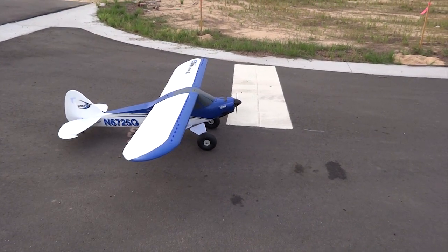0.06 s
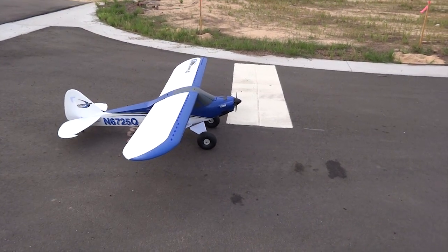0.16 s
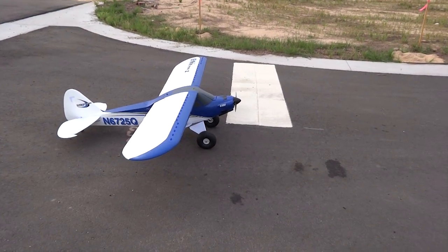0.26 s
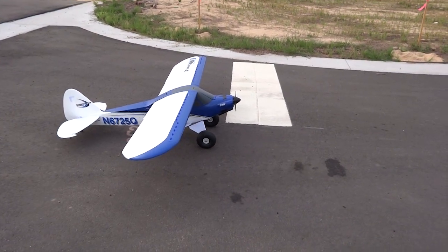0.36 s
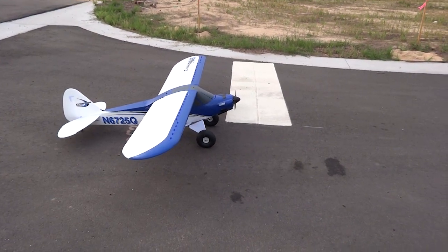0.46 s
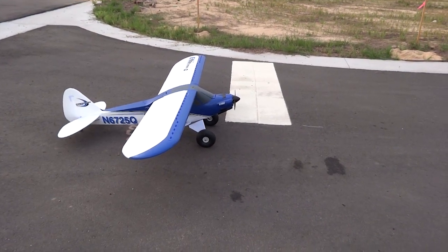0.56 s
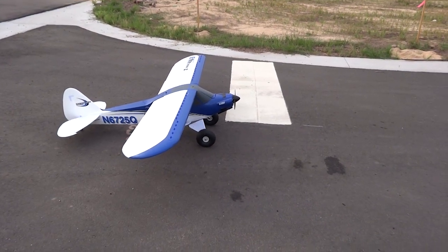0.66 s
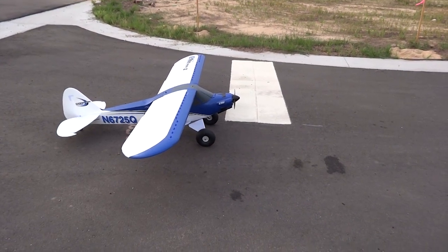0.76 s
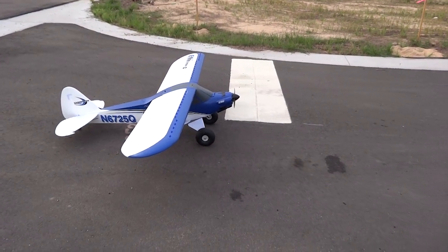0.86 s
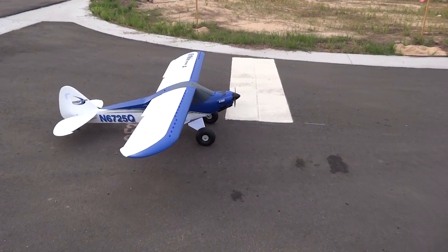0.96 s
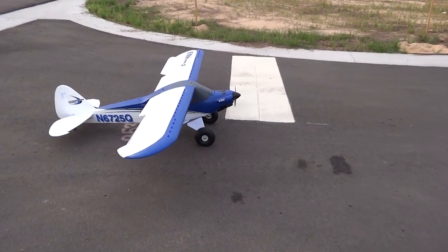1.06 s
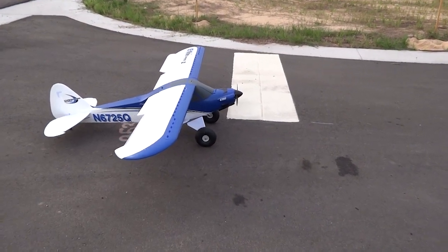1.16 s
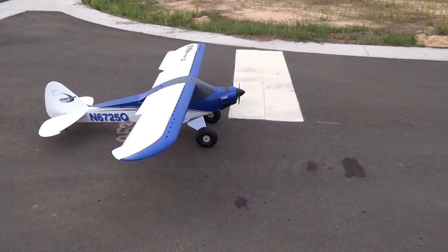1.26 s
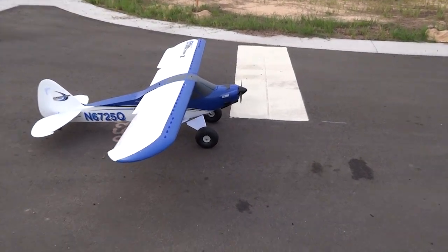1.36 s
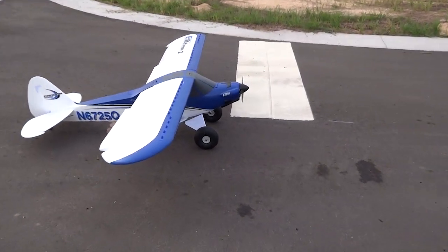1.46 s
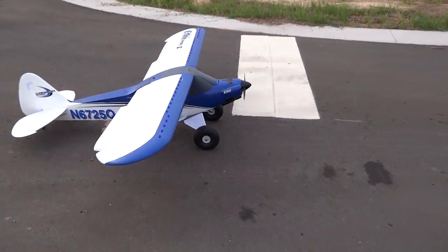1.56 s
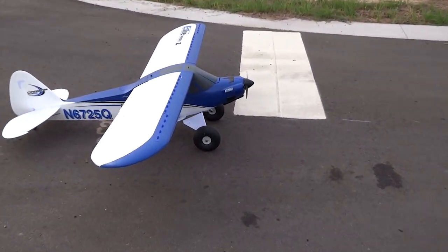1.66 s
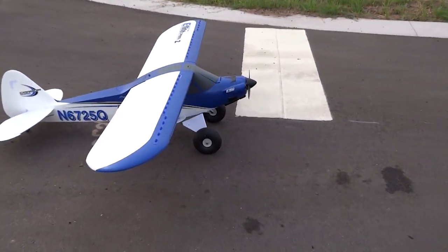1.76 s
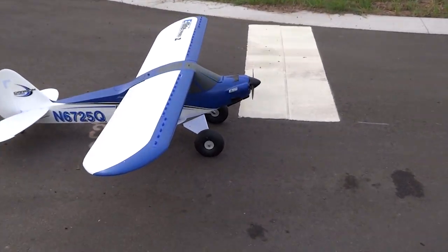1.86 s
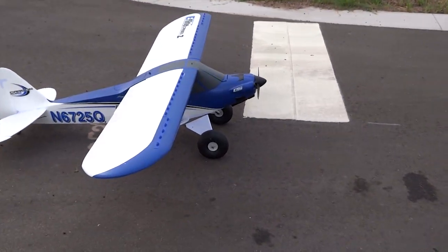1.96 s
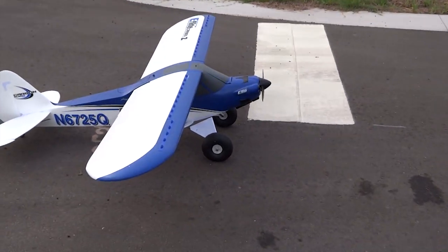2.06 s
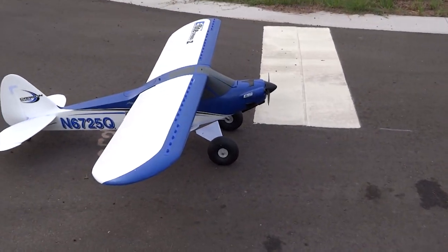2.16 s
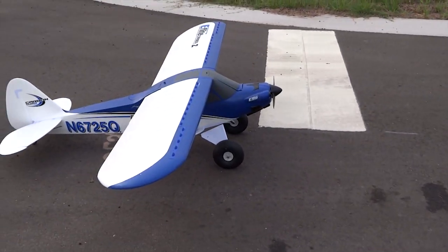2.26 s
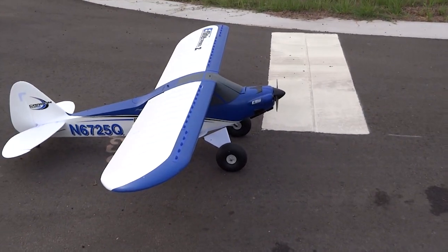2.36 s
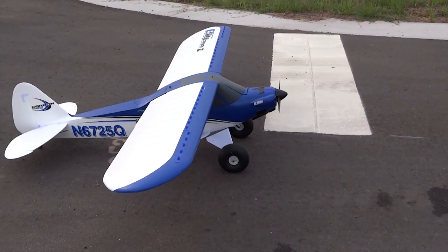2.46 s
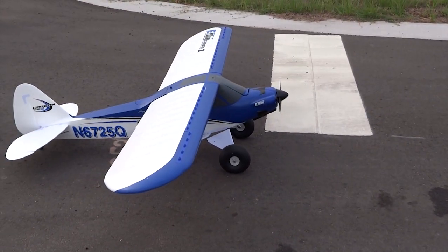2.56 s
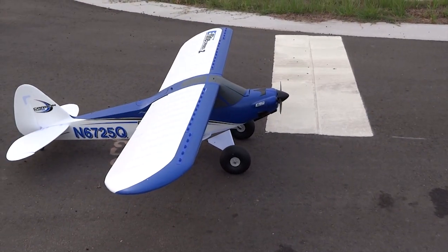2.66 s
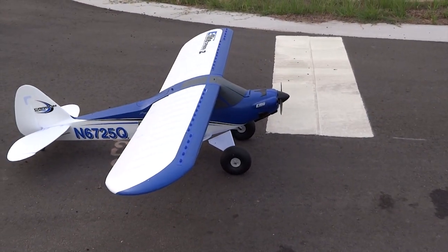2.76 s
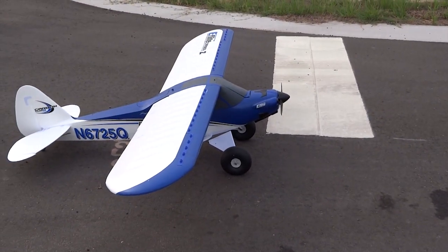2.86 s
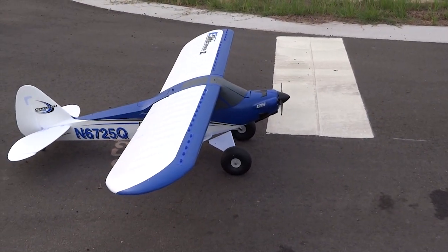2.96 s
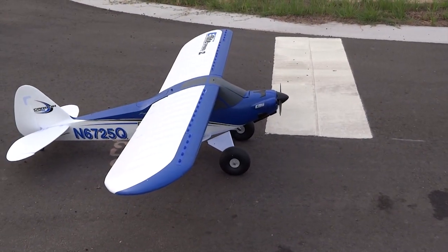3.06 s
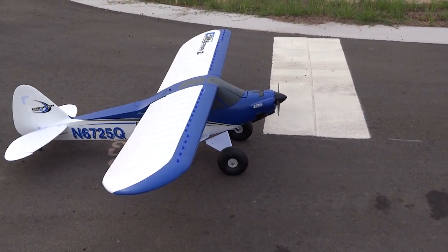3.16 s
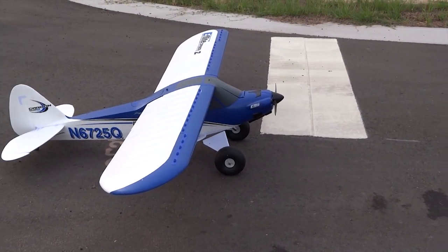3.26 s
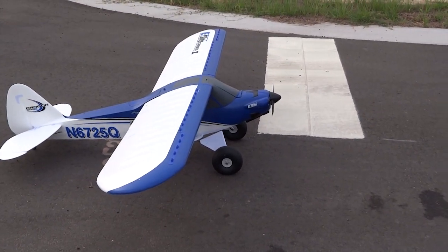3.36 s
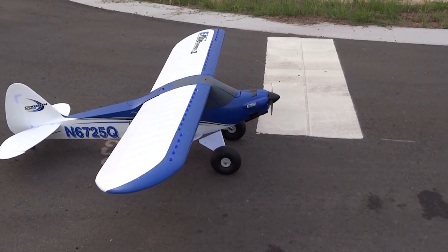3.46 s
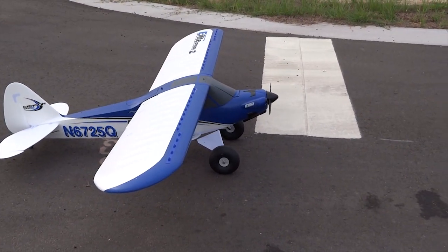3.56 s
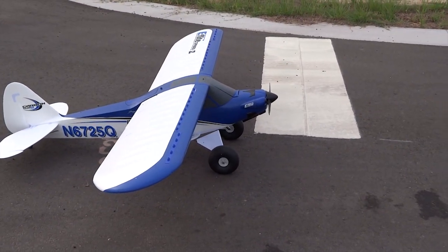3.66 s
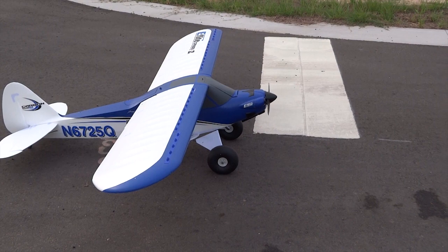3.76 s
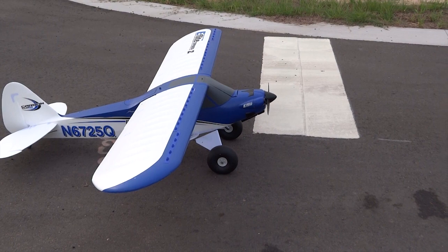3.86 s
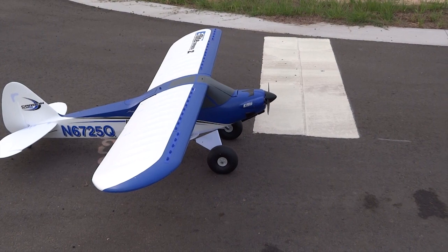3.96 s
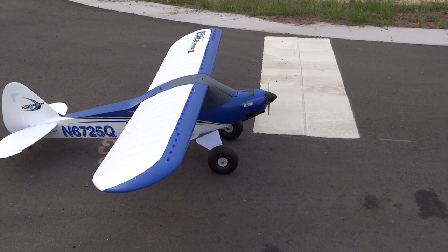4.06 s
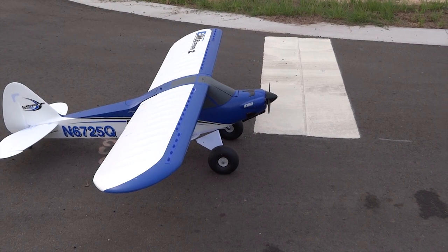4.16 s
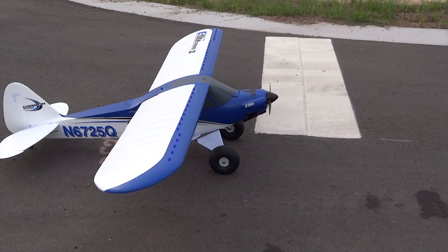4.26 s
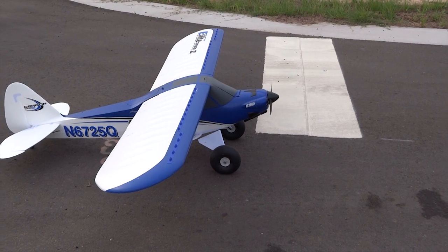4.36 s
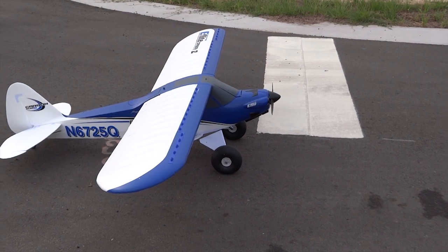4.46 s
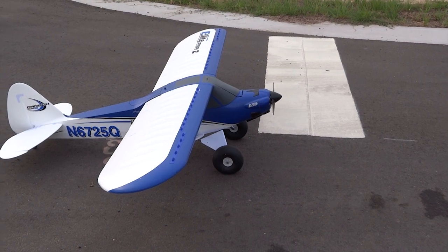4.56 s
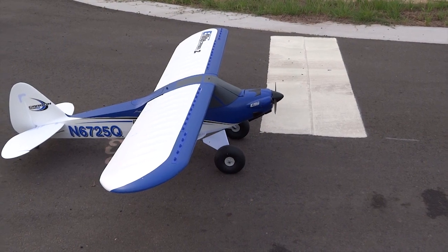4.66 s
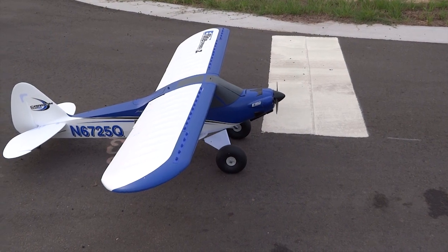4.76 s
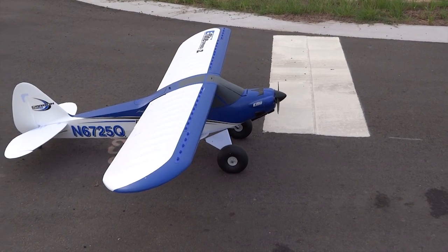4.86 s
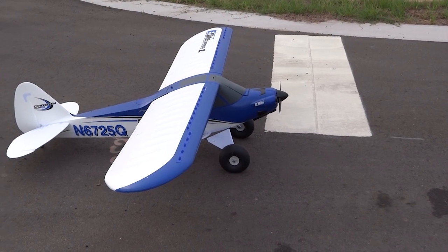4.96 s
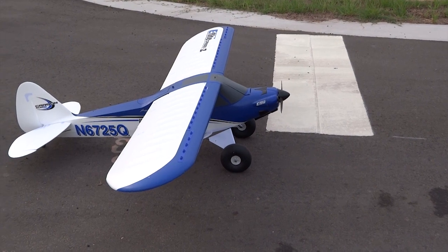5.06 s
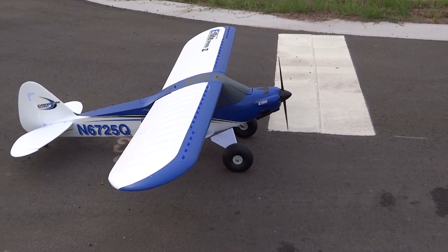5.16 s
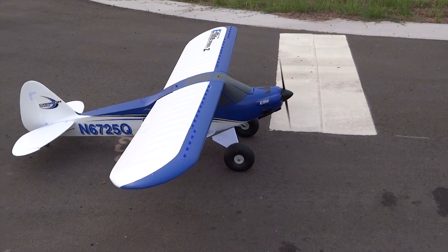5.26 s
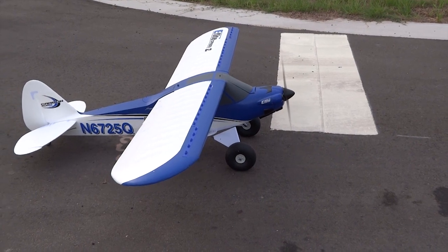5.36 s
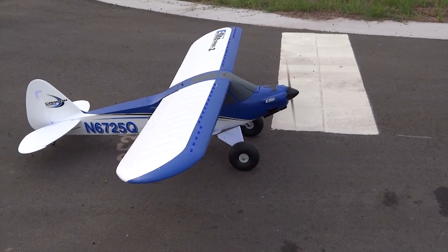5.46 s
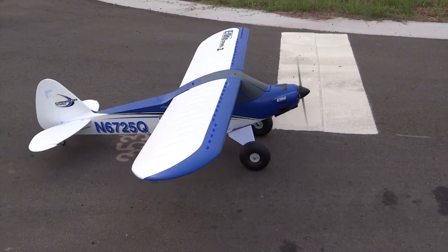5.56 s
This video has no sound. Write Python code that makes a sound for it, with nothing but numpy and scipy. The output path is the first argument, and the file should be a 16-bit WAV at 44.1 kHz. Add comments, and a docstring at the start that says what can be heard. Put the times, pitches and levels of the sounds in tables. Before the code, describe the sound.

Outdoors, nearly mono, on a camera microphone. From 0 to about 0.8 s a foam model plane's tail servo makes gritty plastic whirrs in short uneven bursts, with a dull knock at 0.1 s and small ticks. From 0.85 to 1.8 s the wing servos take over, brighter and louder, rasping strongest around 1.5 to 1.7 s. A thin, steady pulsed electronic buzz, with tiny irregular ticks, lies beneath throughout. Around 1.7 to 2.2 s a faint, very high camera zoom whir runs, with plastic clicks at 2.06 and 2.4 to 2.55 s; it returns faintly near 4.4 s. Distant gliding bird whistles with dull echo come about every half second from 2.2 to 4.9 s, over soft rumble and hiss. A brief servo twitch and ticks occur at 4.75 s. At 5.2 s the motor jolts on, singing thinly and rattling, then its whine climbs steeply, with propeller churn, into an abrupt loud end.

```python
"""The servos of a foam model plane waggle its tail and wing flaps: gear teeth drive case resonances,
over a steady pulsed holding buzz. At the end the brushless motor kicks in; harmonics locked to its shaft
make a loud rising whine, and the propeller adds blade tones and churned air.
A camera's zoom clicks as decaying modes and whirs as wavering tones over noise. Far off, a bird
whistles gliding tones with a dull echo, over a faint outdoor rumble and hiss of filtered noise."""
import sys
import numpy as np
from scipy import signal
from scipy.fft import rfft, irfft, next_fast_len
from scipy.io import wavfile
from scipy.ndimage import uniform_filter1d

SR = 44100
rng = np.random.default_rng(int(sys.argv[2]) if len(sys.argv) > 2 else 0)


def int16_out(signal):
    """Quantize to a 16-bit WAV file."""
    q = np.round(np.clip(np.atleast_2d(signal).T, -1, 1) * 32767)
    wavfile.write(sys.argv[1], SR, q.astype(np.int16))


N = 248228
TIME = np.arange(N) / SR


def from_db(db):
    """Logarithmic level: decibels to amplitude gain."""
    return 10 ** (np.asarray(db) / 20)


def rms_one(x):
    """Normalisation: scale to rms 1."""
    return x / np.sqrt(np.mean(x ** 2) + 1e-20)


def in_time(rows):
    """Linear interpolation: each column of a timed curve at every sample."""
    seconds, *columns = np.transpose(rows)
    return [np.interp(TIME, seconds, column) for column in columns]


def drift(rate):
    """Band-limited chance: random knots, rate per second, joined by lines, with spread 1."""
    knots = rng.standard_normal(N // 8)
    return np.interp(TIME * rate, np.arange(len(knots)), knots) / np.sqrt(2 / 3)


def cycles(hz):
    """Phase is the integral of frequency: running phase in radians."""
    return 2 * np.pi * np.cumsum(hz) / SR


def cut(x, hz, kind, order=2):
    """Butterworth filtering: a maximally flat pass band."""
    sections = signal.butter(order, np.clip(hz, 10, .45 * SR), kind, fs=SR, output="sos")
    return signal.sosfilt(sections, x)


def coloured(x, spectrum):
    """Spectral shaping by a smooth (Hz, dB) curve that falls away below its first point."""
    size = next_fast_len(N + 4096)
    hz = np.arange(1, size // 2 + 2) * SR / size
    points, db = np.transpose(spectrum)
    gain = from_db(np.interp(np.log(hz), np.log(points), db))
    gain = gain * np.minimum(hz / points[0], 1) ** 2
    return irfft(rfft(x, size) * gain, size)[:N]


def resonate(x, modes, direct):
    """Modal superposition: parallel two-pole resonances on top of a share of the direct drive."""
    out = direct * x
    for hz, width, db in modes:
        radius = np.exp(-np.pi * width / SR)
        feed = np.array([1, 0, -1]) * (1 - radius ** 2) / 2
        feedback = [1, -2 * radius * np.cos(2 * np.pi * hz / SR), radius ** 2]
        out = out + from_db(db) * signal.lfilter(feed, feedback, x + 1e-18)
    return out


def grains(per_s, spread_db):
    """Shot noise: tiny random impacts of uneven size."""
    size_db = spread_db * np.minimum(rng.exponential(1, N), 4)
    sizes = from_db(size_db) * rng.choice([-1, 1], N)
    return rms_one(sizes * (rng.random(N) < per_s / SR))


def evened(x, size):
    """Envelope normalisation: hold the rms over a running window of size samples at 1."""
    return x / np.sqrt(np.abs(uniform_filter1d(x * x, size=size)) + 1e-12)


def swell(start, rise, hold, fall):
    """Inertia: the speed of a small motor, 0 to 1, gathers pace, holds and slows to a stop."""
    ramp = np.minimum((TIME - start) / rise, (start + rise + hold + fall - TIME) / fall)
    return np.sin(np.pi / 2 * np.clip(ramp, 0, 1))


def blend(values, weights):
    """Dominance by power: where events overlap, the louder one sets the value."""
    power = weights ** 2
    return np.sum(values * power, axis=0) / (np.sum(power, axis=0) + 1e-20)


# servo moves: (start [s], speeding up [s], full speed [s], slowing [s], top mesh rate [Hz],
# relative gear level [dB], tooth hiss relative to gears [dB], relative whirr drive [dB])
TAIL_MOVES = [ (0.0, .004, .11, 0.073, 310, -36.5, -8, -21), (0.16, .03, 0.22, 0.097, 250, -57, -3, -12),
              (0.39, .12, .03, 0.087, 365, -37, -5, -13.5), (0.59, .035, .005, 0.036, 270, -42, -7, -14),
              (0.645, .06, .04, 0.0586, 350, -37.5, -5.5, -17),
              (0.71, .085, 0.0084, 0.058, 440, -34.5, -4, -14.5), (3.38, .1, 0.2, .2, 250, -61, -18, -25), ]
WING_MOVES = [ (0.855, 0.042, .05, 0.081, 260.3, -40, -8.5, -39),
              (0.94, .13, 0.063, 0.047, 439.9, -37, 0.5, -15),
              (1.16, 0.024, 0.21, 0.092, 247.8, -60, -2.5, -20),
              (1.395, 0.14, .03, .06, 437.8, -31, 0.5, -8),
              (1.605, 0.025, .015, 0.043, 282.3, -40, -0.5, -14),
              (1.64, 0.054, 0.00465, .06, 382.7, -29.5, -0.5, -11.5),
              (1.72, 0.023, 0.048, 0.057, 265, -42.5, -14.5, -41),
              (4.74, .07, 0.072, 0.031, 270, -50.5, -5, -20), ]
# colour of the servo gears: (frequency [Hz], relative spectral level [dB])
TAIL_COLOUR = [(120, -62), (200, -26.5), (352, -20.5), (437, -17.5), (842, -17), (1030, -8), (1400, -7.5),
               (2060, 0), (2250, -9), (3180, -1), (4580, -15), (5700, -15), (9140, -11), (13900, -19.5),
               (15500, -32.5)]
WING_COLOUR = [(120, -56), (200, -15), (358, -21.5), (437, -11.5), (506, -5), (769, -8), (858, -10),
               (974, -4.5), (1510, -6), (2290, -5), (3240, -6.5), (5110, -11), (7620, -6), (9140, 2),
               (15500, -9.5)]
# resonances of servo cases and linkage: (frequency [Hz], width [Hz], gain [dB])
TAIL_MODES = [(1230, 67, -1), (2080, 49, 1.5), (2437, 42, 8.5), (3060, 90, -14), (5820, 150, 6),
              (8700, 190, -10)]
WING_MODES = [(900, 23, -13), (1526, 40, 8), (2770, 180, -14), (3220, 600, 1.5), (3840, 190, -22),
              (9050, 320, -4)]
# tones of uneven teeth: (multiple of the mesh rate, relative level [dB])
MESH_ORDERS = [(1, -2), (2, 0), (3, -5), (4, -6), (5, -12), (6, -11)]
# mesh rate, loudness, hiss and whirr all follow the servo's speed
CRAWL_SHARE, LOUDNESS_POWER, HISS_POWER, WHIRR_GROWTH_DB = .56, 1.487, 1.71, 10
# radio frames give the servos a fresh push, and moving servos throb at their rate
FRAME_HZ, FRAME_THROB = 45.4, .13


def servo(moves, colour, modes, direct, tone_db, rattle_db, gear_db, hiss_db):
    """Mesh excitation: plastic gear teeth click and scrape in step with the mesh and ring the case."""
    speed = np.array([swell(*move[:4]) for move in moves])
    top_hz, level_db, bright_db, top_whirr_db = np.transpose(moves)[4:, :, None]
    gear_gain = from_db(level_db + gear_db) * speed ** LOUDNESS_POWER
    hiss_gain = from_db(level_db + bright_db + hiss_db) * speed ** HISS_POWER

    mesh_hz = blend(top_hz * (CRAWL_SHARE + (1 - CRAWL_SHARE) * speed), gear_gain)
    mesh = cycles(mesh_hz * (1 + .035 * drift(300)))
    teeth = grains(11000, 3.4) * (1 + 0.045 * np.cos(mesh)) * from_db(rattle_db * drift(170))
    whirr_db = blend(top_whirr_db + WHIRR_GROWTH_DB * (speed - 1), gear_gain)
    whirr = sum(np.sin(k * mesh) * from_db(db + 3 * drift(35)) for k, db in MESH_ORDERS)

    drive = teeth + from_db(whirr_db + tone_db) * whirr
    sound = coloured(resonate(drive, modes, direct), colour)
    gears = evened(cut(sound, 5720, "low", order=4), size=1500)
    hiss = rms_one(cut(sound, 4920, "high", order=4))
    throb = 1 + FRAME_THROB * np.cos(2 * np.pi * FRAME_HZ * TIME)
    # overlapping moves add in power
    return throb * (np.linalg.norm(gear_gain, axis=0) * gears + np.linalg.norm(hiss_gain, axis=0) * hiss)


# the load on the holding servos changes and stays:
# (from time [s], relative level of 3rd harmonic [dB], of 4th [dB], of 5th [dB])
HOLDS = [ (0.0, -59, -56.5, -65.5), (0.43, -62, -59, -70), (1.17, -54.5, -57.5, -68),
         (1.33, -67, -59.5, -80), (1.79, -63, -57.5, -78), (2.06, -63, -55, -64), (2.65, -57, -53, -60),
         (4.76, -63.5, -59, -66.5), ]
# weaker buzz harmonics: (multiple of the buzz rate, relative level [dB])
BUZZ_ORDERS = [(1, -19), (2, -20), (6, -20), (7, -13), (8, -18), (9, -23), (10, -18), (11, -16), (12, -23),
               (13, -26), (14, -31)]
BUZZ_HZ, HOLD_FADE_S = 834.7, 0.028
WANDER_DB, WANDER_PER_S = 1.2, 14  # of the three main harmonics
NUDGE_SHARE, NUDGE_TICK_DB = .4, -41  # share of radio frames that nudge a servo; gain of its tick


def holding_buzz(flutter_db=1.8, upper_wander_db=2., upper_db=-2.0):
    """Periodic excitation: steady drive pulses make harmonics; a radio-frame nudge dips them and ticks."""
    starts, *columns = np.transpose(HOLDS)
    spell = np.searchsorted(starts[1:], TIME)
    fade = 1 + round(HOLD_FADE_S * SR)
    main_db = [uniform_filter1d(column[spell], size=fade) for column in columns]
    fourth_db = main_db[1]
    phase = cycles(BUZZ_HZ + .4 * drift(9))

    new_frame = np.diff(np.floor(TIME * FRAME_HZ), prepend=0)
    nudges = new_frame * (rng.random(N) < NUDGE_SHARE) * rng.uniform(.15, .7, N)
    steady = 1 - np.minimum(np.convolve(nudges, np.hanning(160), "same"), 1)

    buzz = 0
    for k, db in enumerate(main_db, 3):
        buzz = buzz + from_db(db + WANDER_DB * drift(WANDER_PER_S)) * np.sin(k * phase)
    for k, db in BUZZ_ORDERS:
        gain = from_db(fourth_db + db + upper_db + upper_wander_db * drift(9))
        buzz = buzz + gain * np.sin(k * phase + rng.uniform(0, 2 * np.pi))

    tick_modes = [(2750, 350, 22), (3300, 300, 26), (4150, 400, 17)]  # Hz, width Hz, dB
    ticks = cut(resonate(nudges, tick_modes, direct=0), [2500, 4900], "band")
    return np.sqrt(2) * from_db(flutter_db * drift(16)) * steady * buzz + from_db(NUDGE_TICK_DB) * ticks


# linkage ticks: (time [s], relative level [dB])
TICKS = [(0.238, -37), (0.281, -33.5), (0.348, -37), (0.3736, -31.5), (0.6844, -45), (0.856, -27.5),
         (0.8966, -25.5), (1.627, -25), (1.8134, -52), (4.752, -34), (4.775, -31.5), (4.818, -28),
         (5.2135, -46)]


def linkage_ticks(t60=0.054, level_db=-9, attack_s=.003):
    """Impact and decay: slack in the gears and push rods is taken up with a short rattle."""
    envelope = np.zeros(N)
    for s, db in TICKS:
        age = TIME - s
        attack = np.clip(age / attack_s + .5, 0, 1)
        envelope += from_db(db - 60 * np.abs(age) / t60) * attack
    rattle = resonate(cut(rng.standard_normal(N), 3000, "high"), WING_MODES, direct=0.15)
    return from_db(level_db) * envelope * rms_one(rattle)


# knock of a control surface at its stop: (time [s], peak level [dB])
KNOCK = [(0.097, -29)]
# ring of the foam tail: (frequency [Hz], width [Hz], gain [dB])
KNOCK_MODES = [(960, 64, -7), (1010, 100, 5), (1150, 91, 2)]


def surface_knock():
    """Impulse response: a control surface bumps its stop; the foam tail answers with a dull ring."""
    push = np.zeros(N)
    for s, db in KNOCK:
        push[round(s * SR)] = from_db(db)
    ring = resonate(push, KNOCK_MODES, direct=0)
    return ring * push.max() / np.abs(ring).max()


# motor shaft run-up: (time [s], speed [turns per s])
SHAFT = [(5.21, 1), (5.32, 7.4), (5.35, 11.4), (5.42, 24.1), (5.50, 39.6), (5.56, 55), (5.63, 69.5)]
# airframe resonances: (frequency [Hz], width [Hz], gain [dB])
AIRFRAME_MODES = [(220, 52, 5), (572, 29, 6.5), (680, 46, -2.5), (934, 39, 3), (996, 54, 6),
                  (1222, 67, 2.5), (1456, 48, -1.5), (1669, 72, 6), (2103, 65, 4.5), (2434, 115, 3.5),
                  (2550, 53, -6), (3080, 110, -10), (4110, 130, -7), (4680, 70, -0.5)]
# whine of 14 poles passing 12 slots:
# (multiple of 42 cycles per turn, relative level [dB], speed above which it fades [turns per s])
WHINE_ORDERS = [(1, -18, 51.2), (2, -20.5, 61), (3, -27.5, 26), (4, -32, 22)]
MOTOR_START_S = 5.2135
RADIATES_ABOVE_HZ = 990  # the small nose radiates lower tones poorly


def motor_whine(level_db=2.5, fade_power=8):
    """Swept resonance: commutation harmonics rise and flare as they cross each airframe mode."""
    turns, = in_time(SHAFT)
    angle = cycles(turns * (1 + .015 * drift(500)))
    commutation, commutation_hz = 42 * angle, 42 * turns
    # unequal magnets make the pull throb within each turn
    throb = 1 + .3 * np.cos(2 * angle) + .25 * np.cos(7 * angle)
    pull = 0
    for k, db, fade_turns in WHINE_ORDERS:
        radiated = 1 / np.hypot(1, (RADIATES_ABOVE_HZ / (k * commutation_hz)) ** 2)
        fading = 1 / np.hypot(1, (turns / fade_turns) ** fade_power)
        tone = from_db(db + 2 * drift(250)) * np.sin(k * commutation)
        pull = pull + radiated * fading * tone
    ringing = resonate((TIME > MOTOR_START_S) * throb * pull, AIRFRAME_MODES, direct=.35)
    return from_db(level_db) * cut(ringing, 240, "high")


# colour of the rattling airframe: (frequency [Hz], relative spectral level [dB])
AIRFRAME_COLOUR = [(120, -22), (220, -15), (400, -3.5), (600, -3.5), (900, 5), (1700, 3), (2600, 1.5),
                   (3500, -4.5), (5000, -15), (7000, -11), (12000, -21)]
# colour of bearing and blade-tip hiss: (frequency [Hz], relative spectral level [dB])
MOTOR_HISS = [(2500, 8), (3500, 23), (4700, 15.5), (6000, 12.5), (7500, 12), (10000, 11.5), (13000, 14.5),
              (15500, 2)]


def motor_rattle(rattle_db=-20, lock_db=-4, shaking_turns=4.48, shaking_power=3.7,
                 bearing_db=-28, bearing_power=0.81, tip_db=-23, tip_power=5):
    """Speed-dependent excitation: shaking rattles mount and cowl; bearings and tips hiss with speed."""
    turns, = in_time(SHAFT)
    angle, speed = cycles(turns), turns / 60
    shaking = 1 / (1 + (shaking_turns / turns) ** shaking_power)
    # the shaking eases while the rotor runs locked to the drive
    locked = np.interp(TIME, [5.27, 5.35, 5.46, 5.58], [0, 1, 1, 0])
    knocks = grains(12000, 1.6) * (1 + .3 * np.cos(42 * angle))
    ringing = resonate(knocks, AIRFRAME_MODES, direct=0.44)
    body = evened(coloured(ringing, AIRFRAME_COLOUR), size=500)
    rattle = from_db(rattle_db + lock_db * locked) * shaking * body

    hiss = rms_one(coloured(grains(20000, 3.9), MOTOR_HISS)) * (1 + 0.2 * np.cos(2 * angle))
    bearing_gain = from_db(bearing_db) * speed ** bearing_power
    tip_gain = from_db(tip_db) * np.minimum(speed, 1) ** tip_power
    return (TIME > MOTOR_START_S) * (rattle + np.hypot(bearing_gain, tip_gain) * hiss)


def motor_kick(level_db=-40, t60=0.032):
    """Transient excitation: the first current pulse jolts the rotor and the whole nose."""
    age = TIME - MOTOR_START_S
    jolt = rms_one(resonate(cut(rng.standard_normal(N), 500, "high"), AIRFRAME_MODES, direct=0.33))
    return jolt * (age >= 0) * from_db(level_db - 60 * np.abs(age) / t60)


# two-blade propeller: (cycles per turn, relative level [dB])
PROP_ORDERS = [(2, -50.5), (4, -31.5), (6, -32.5), (8, -27), (10, -29.5), (12, -57)]


def propeller(growth=5.7, wash_db=-37):
    """Aerodynamic power law: blade tones and churned air grow steeply with tip speed."""
    turns, = in_time(SHAFT)
    angle = cycles(turns)
    tones = sum(from_db(db + 2) * np.sin(k * angle + rng.uniform(0, 2 * np.pi)) for k, db in PROP_ORDERS)
    wash_colour = [(60, -18), (180, 0), (400, 14), (600, 9), (1200, -17), (4000, -32)]  # Hz, dB
    wash = from_db(wash_db) * rms_one(coloured(rng.standard_normal(N), wash_colour))
    return (turns / 60) ** growth * (tones + wash)


# switching tone, gone at full throttle: (time [s], mean rms level [dB])
SWITCHING = [(5.213, -50), (5.28, -46.5), (5.35, -38), (5.44, -36), (5.487, -33.5), (5.494, -60)]
SWITCH_HZ, FULL_THROTTLE_S = 7812, 5.494


def speed_controller():
    """Magnetic excitation: chopped current makes the windings sing until the throttle is fully open."""
    db, = in_time(SWITCHING)
    chopping = (TIME > MOTOR_START_S) & (TIME < FULL_THROTTLE_S)
    return chopping * from_db(db + drift(340)) * np.sqrt(2) * np.sin(2 * np.pi * SWITCH_HZ * TIME)


# clicks of the zoom lever: (time [s], relative level [dB], relative treble level [dB])
LEVER = [(2.057, -23, -53), (2.432, -27.5, -5.5), (2.512, -41, -15.5), (2.543, -32.5, -17),
         (2.548, -35, -25)]
# modes of the camera's shell: (frequency [Hz], relative level [dB], 60 dB decay time [s])
LEVER_MODES = [(1096, -6.5, 0.017), (1760, -6.5, 0.013), (2530, -6.5, 0.016), (3200, 3, 0.0043),
               (4360, -7, 0.0048), (6120, -5, 0.002), (8400, -26, 0.0033), (13000, -15, 0.0027)]


def zoom_lever(level_db=-4, contact_hz=4500):
    """Modal decay: each click rings the camera's plastic shell briefly, with its own brightness."""
    out, age = np.zeros(N), np.arange(2048) / SR
    for s, db, treble_db in LEVER:
        ring = np.zeros(len(age))
        for hz, mode_db, t60 in LEVER_MODES:
            phase = 2 * np.pi * hz * age + rng.uniform(0, 2 * np.pi)
            ring += from_db(mode_db - 60 * age / t60) * np.sin(phase)
        ring = ring * np.minimum(age / .0005, 1)  # half a millisecond of onset
        treble = from_db(treble_db + 26) * cut(ring, contact_hz, "high", order=4)
        click = cut(ring, contact_hz, "low") + treble
        at = round(s * SR)
        out[at:at + len(age)] += from_db(db + level_db) * click
    return out


# runs of the lens drive: (start [s], length [s], top whine frequency [Hz], relative level [dB])
LENS_RUNS = [(1.71, 0.28, 13300, -56), (1.878, 0.082, 12950, -51), (1.924, 0.19, 13050, -55.5),
             (2.128, 0.042, 12750, -62), (4.385, 0.12, 13000, -59), (4.48, 0.18, 12500, -68)]
LENS_SAG_HZ = 900  # the whine lies this much lower as a run starts and stops


def zoom_motor(whine_db=-2, whir_db=-4.0):
    """Frequency modulation: two thin wavering tones over a whir; pitch and level arch with each run."""
    speed = np.array([swell(s, length / 2, 0, length / 2) for s, length, *_ in LENS_RUNS])
    top_hz, db = np.transpose(LENS_RUNS)[2:, :, None]
    gains = from_db(db) * speed
    hz = blend(top_hz - LENS_SAG_HZ * (1 - speed), gains)
    upper = np.sin(cycles(hz + 80 * drift(45)))
    lower = .5 * np.sin(cycles(hz - 400 + 300 * drift(18)))
    whir_colour = [(1500, -3.5), (4000, -4.5), (9000, -14), (11500, -8), (12700, 2), (14500, -21)]  # Hz, dB
    whir = rms_one(coloured(rng.standard_normal(N), whir_colour))
    return np.linalg.norm(gains, axis=0) * (from_db(whine_db) * (upper + lower) + from_db(whir_db) * whir)


# bird slurs: (time [s], length [s], start frequency [Hz], end frequency [Hz], relative level [dB])
BIRD = [(2.174, 0.15, 1750, 3030, -60), (2.75, 0.21, 3580, 1860, -61.5), (3.295, 0.19, 3450, 1980, -60.5),
        (3.766, .18, 3600, 1970, -61.5), (4.23, 0.23, 3530, 2080, -65), (4.829, 0.13, 2000, 2980, -62)]


def bird(echo_db=-3, echo_t60=0.93, echo_top_hz=2300, late_swell=1.7):
    """Scattering: distant pure slurs, swelling towards their end, trail a dull decaying echo."""
    out = np.zeros(N)
    for s, length, start_hz, end_hz, db in BIRD:
        along = np.clip((TIME - s) / length, 0, 1)
        hz = start_hz + (end_hz - start_hz) * along + 45 * drift(400)
        envelope = np.sqrt(np.abs(np.sin(np.pi * along ** late_swell)))
        out += from_db(db) * envelope * np.sin(cycles(hz))
    scatter = rng.standard_normal(SR) * from_db(-60 * TIME[:SR] / echo_t60)
    scattered = signal.fftconvolve(out, scatter / np.linalg.norm(scatter))[:N]
    echo = cut(scattered, echo_top_hz, "low")
    return out * from_db(2 * drift(90)) + from_db(echo_db) * echo


# outdoor background: (frequency [Hz], relative spectral level [dB])
AIR = [(25, -26), (50, -13), (80, -2.5), (130, -1), (200, -6.5), (300, -15), (420, -21), (750, -11.5),
       (1300, -17.5), (2200, -14.5), (4000, -22.5), (6000, -27), (10000, -26.5), (15600, -34.5)]


def outdoor_air(level_db=-62.5):
    """Stationary noise: far traffic rumble and a faint even hiss."""
    return from_db(level_db) * rms_one(coloured(rng.standard_normal(N), AIR))


# difference between the two microphone ports: (frequency [Hz], level against their sum [dB])
PORT_DIFFERENCE = [(30, -6), (130, -64), (500, -20), (1200, -26), (3500, -21), (5500, -16.5), (7000, -62),
                   (15000, -70)]


def scene():
    """Superposition: all sources lie straight ahead; the close microphone pair hears almost the same."""
    tail = servo(TAIL_MOVES, TAIL_COLOUR, TAIL_MODES, direct=0.98,
                 tone_db=1.5, rattle_db=0.5, gear_db=-1.5, hiss_db=-2.5)
    wing = servo(WING_MOVES, WING_COLOUR, WING_MODES, direct=0.95,
                 tone_db=1.5, rattle_db=1.57, gear_db=-2.0, hiss_db=-2.5)
    controls = tail + wing + holding_buzz() + linkage_ticks() + surface_knock()
    drive = motor_whine() + motor_rattle() + motor_kick() + propeller() + speed_controller()
    mid = controls + drive + zoom_lever() + zoom_motor() + bird() + outdoor_air()
    # a tiny gap between the ports gives a difference a quarter cycle out of step
    quarter_cycle = signal.hilbert(mid, next_fast_len(N)).imag[:N]
    side = coloured(quarter_cycle, PORT_DIFFERENCE) + from_db(-17) * outdoor_air()
    return np.array([mid + side, mid - side]) * from_db([[-.07], [.07]])


def record(dry):
    """Compression and band limiting: gain control holds loud sound at a ceiling; a steep cut ends the top."""
    # running power with a memory of 90 samples
    power = signal.lfilter([1 / 90], [1, -1 + 1 / 90], np.mean(dry ** 2, axis=0))
    ceiling = from_db(-16.2)
    gain = (1 + (np.sqrt(power) / ceiling) ** 6) ** (-1 / 6)
    top_cut = signal.ellip(10, .2, 80, 15700, fs=SR, output="sos")  # ripple dB, stop band dB, Hz
    return signal.sosfilt(top_cut, dry * gain)


dry = scene()
out = record(dry)
int16_out(out)
```